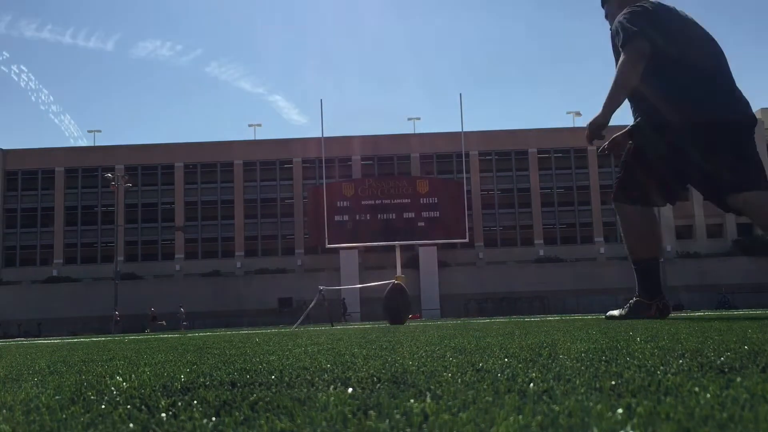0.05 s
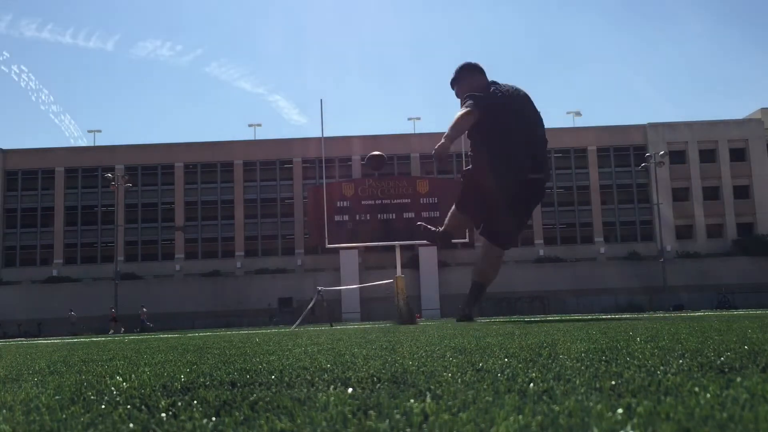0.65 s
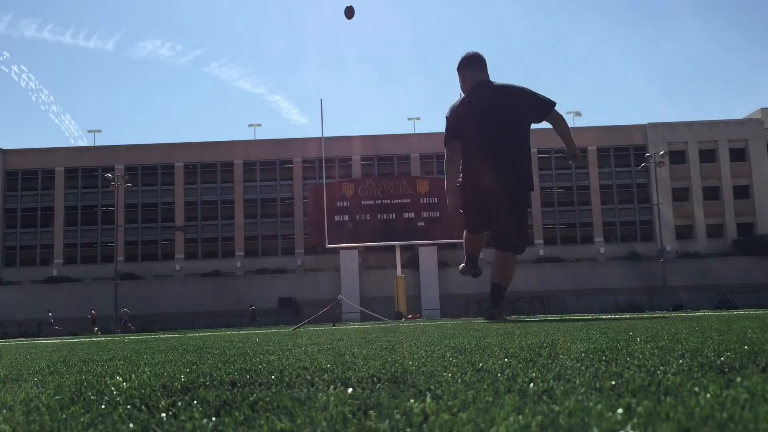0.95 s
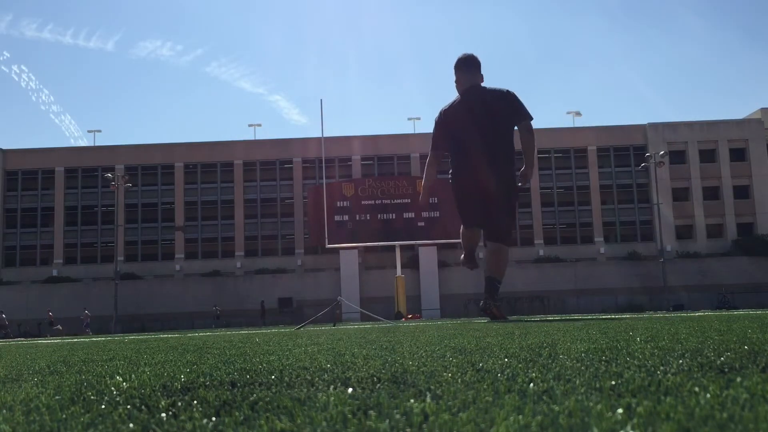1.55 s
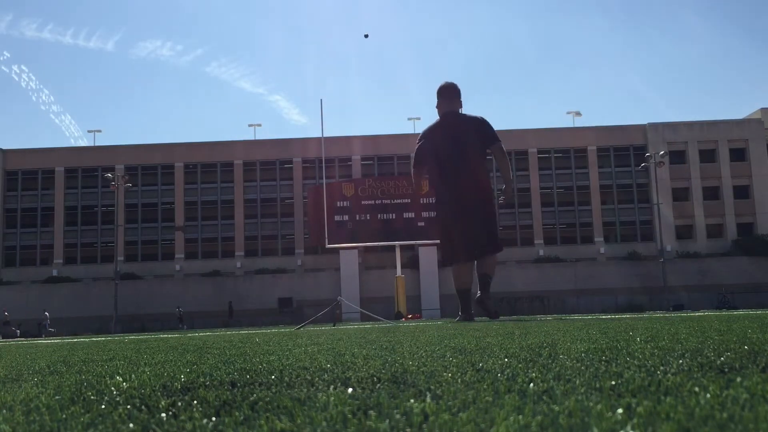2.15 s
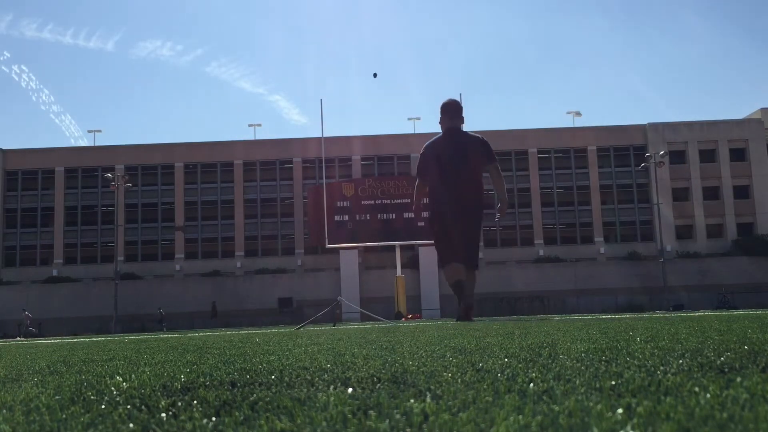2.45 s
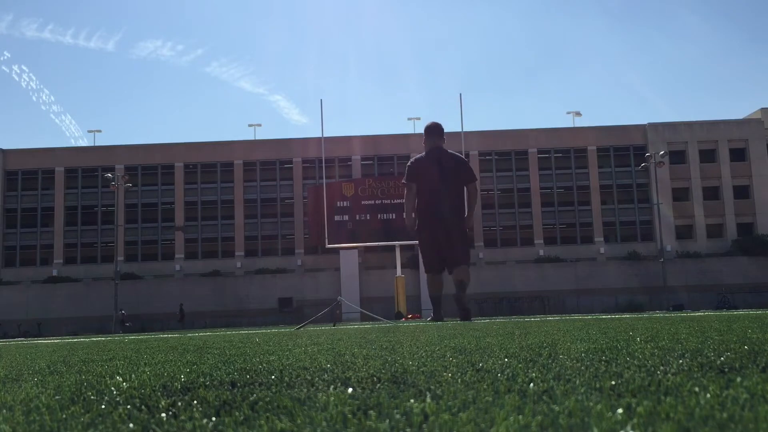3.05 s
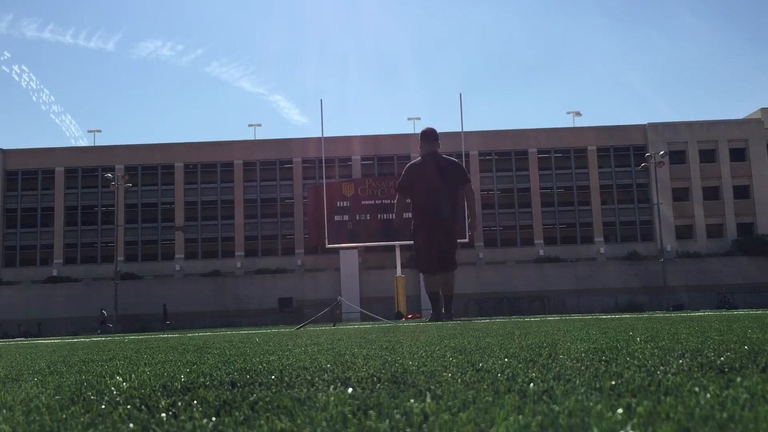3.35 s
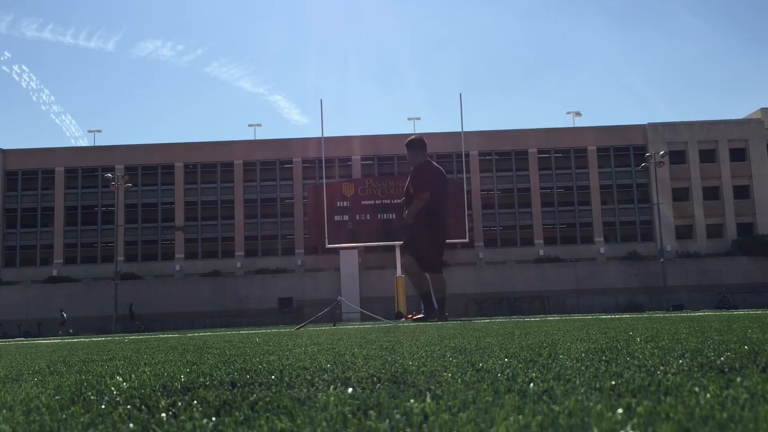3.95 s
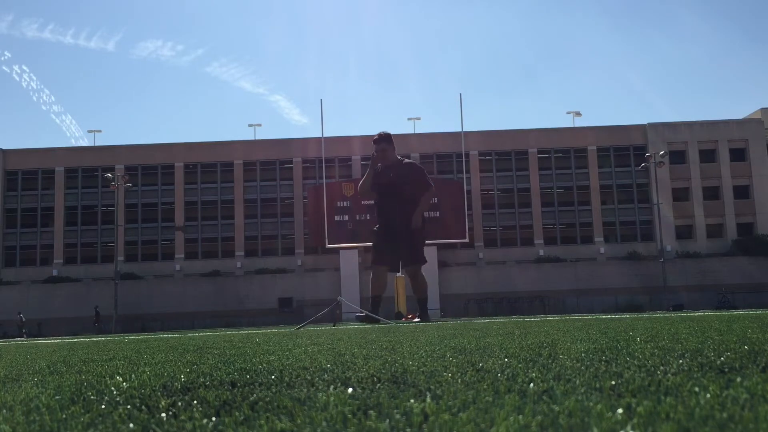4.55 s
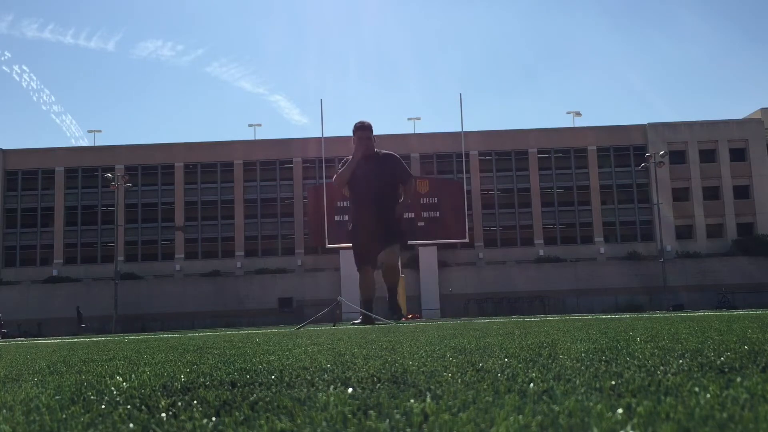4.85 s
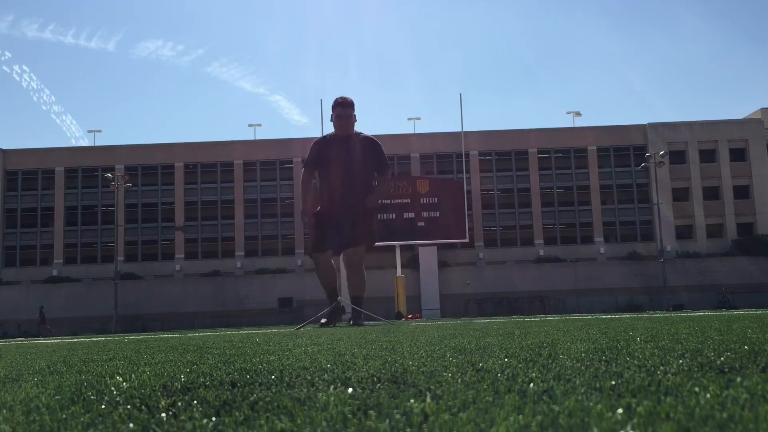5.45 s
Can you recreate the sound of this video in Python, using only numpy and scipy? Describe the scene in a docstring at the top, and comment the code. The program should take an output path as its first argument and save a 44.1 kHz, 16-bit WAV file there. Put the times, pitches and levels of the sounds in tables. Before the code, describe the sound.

A football is kicked with one loud, deep thud on an outdoor pitch, with soft footsteps over a steady low traffic rumble.

```python
"""On an artificial pitch in a city, a football is kicked off a tee near a microphone on the ground.
Traffic rumbles throughout. After a faint tick and two run-up steps the boot brushes the turf and strikes:
the ball thuds, its shell and enclosed air resonate, rubber crumbs spray and walls reflect the blow.
A limiter briefly ducks everything. The kicker lands, and two more footfalls come three seconds later."""
import sys
import numpy as np
from scipy import signal
from scipy.fft import rfft, irfft, next_fast_len
from scipy.io import wavfile
from scipy.ndimage import uniform_filter1d, minimum_filter1d, map_coordinates

SR = 44100
rng = np.random.default_rng(int(sys.argv[2]) if len(sys.argv) > 2 else 0)


def unload_audio(sound):
    """Save the sound as a 16-bit wav file, at the path given as the first command line argument."""
    columns = np.transpose(np.atleast_2d(sound))
    # keep every value between -1 and 1, then stretch to whole-number steps
    steps = np.round(np.clip(columns, -1, 1) * 32767)
    wavfile.write(sys.argv[1], SR, steps.astype(np.int16))


N = 246424
KICK_S = 0.6926  # the boot meets the ball

# Noise spectra. Each row: frequency in Hz, relative spectral density in dB.
ENGINE_SPECTRUM = [(20, -38.5), (30, -28.5), (40, -13), (48, -0.5), (62, -4.5), (100, 1.5), (140, -3),
                   (195, -5), (230, -14.5), (360, -23.5), (600, -37), (800, -46), (1200, -72)]
TYRE_SPECTRUM = [(250, -22.5), (500, -6.5), (780, -9), (970, -8), (1150, -11), (1800, -15.5), (2600, -22.5),
                 (5800, -29), (7600, -34.5), (15000, -51)]
TICK_SPECTRUM = [(5000, -25), (7200, 1), (9500, -1), (11000, -16), (15000, -13.5)]
SOLE_SPECTRUM = [(200, -2), (550, 13), (1000, 4), (1800, -7), (3000, -24), (8000, -25), (15000, -39)]
BLADE_SPECTRUM = [(200, -6), (600, 16), (1500, -9), (2800, -4), (6000, -14), (9000, -17), (15000, -18.5)]
CRACK_SPECTRUM = [(500, -3.5), (900, 6), (1400, -0.5), (1900, -13.5), (2600, -19), (3800, -12.5),
                  (6500, -27), (9000, -34.5), (12500, -29.5), (15500, -34)]
CRUMB_SPECTRUM = [(800, -26), (2500, 4), (3600, 4), (6500, 2.5), (10000, -4), (15000, -5)]
HISS_SPECTRUM = [(1000, 0.5), (5600, 2.5), (7600, -1.5), (9200, 2), (10500, -7), (12000, 0.5), (15600, -9)]
# Feet on turf. Each row: start in seconds, knock frequency in Hz, knock level in dB, scuff level in dB.
FOOTFALLS = [(.468, 605, -41, -55), (0.61, 520, -43.5, -49), (0.927, 535, -54, -59), (4.093, 288, -34, -62),
             (4.2036, 210, -23.5, -66)]
# Modes of the taut leather shell and of the air inside it.
# Each row: frequency in Hz, level in dB, time to decay by 60 dB in seconds.
SHELL_MODES = [(767, -23.5, 0.023), (845, -13.5, 0.013), (1210, -22.5, 0.018), (1840, -25, 0.029),
               (2220, -33.5, 0.015), (3900, -36, 0.014), (5500, -39, 0.006), (6270, -32, 0.015)]
CAVITY_MODES = [(887, -36.5, 0.21), (1490, -47, 0.19), (1700, -46, 0.15), (2060, -49, 0.18),
                (3230, -56, 0.16)]
# Reflections from the walls around the pitch.
# Each row: delay in seconds, level in dB before WALL_RESPONSE, time to decay by 60 dB in seconds.
REFLECTIONS = [(.038, -37.5, 0.1), (0.094, -39, 0.42)]
# Frequency response of the walls. Each row: frequency in Hz, gain in dB.
WALL_RESPONSE = [(100, -18), (400, -11), (900, 13.5), (2000, 15.5), (5000, 10), (14000, 6)]


def amp(db):
    """Decibels as an amplitude ratio."""
    return 10 ** (np.asarray(db) / 20)


def since(s):
    """Seconds elapsed after time s, zero before it."""
    return np.maximum(np.arange(N) / SR - s, 0)


def swell(t, peak_s, order=2):
    """A smooth rise to 1 at peak_s, then an exponential decay."""
    u = t / max(peak_s, 1e-4)
    return (u * np.exp(1 - u)) ** order


def hump(s, half_s):
    """A Gaussian of height 1 around time s."""
    return np.exp(-((since(0) - s) / half_s) ** 2)


def wobble(rate):
    """A smooth random curve, rate knots a second."""
    knots = rng.standard_normal(int(N * rate / SR) + 4)
    return map_coordinates(knots, [np.arange(N) * rate / SR])


def filtered(x, response):
    """The spectrum of x multiplied by a frequency response."""
    size = next_fast_len(N + SR // 2)
    return irfft(rfft(x, size) * response(np.fft.rfftfreq(size, 1 / SR)), size)[:N]


def coloured(x, spectrum):
    """x shaped by (Hz, dB) points joined on a logarithmic frequency axis."""
    points_hz, db = np.transpose(spectrum)
    return filtered(x, lambda hz: amp(np.interp(np.log(hz + 1), np.log(points_hz + 1), db)))


def noise(spectrum, grain_db=0):
    """Coloured noise of rms 1; grain_db roughens it by fast amplitude modulation."""
    grains = amp(grain_db * wobble(1500))
    x = coloured(rng.standard_normal(N) * grains, spectrum)
    return x / np.sqrt(np.mean(x ** 2) + 1e-20)


def traffic(engine_db=-33, tyre_db=-66, lift_db=2):
    """Incoherent sources sum to noise: distant engines rumble, and tyres swell as nearer cars pass."""
    surge_db = lift_db * hump(1.14, half_s=0.42)
    passing_db = lift_db * hump(1.58, half_s=2.9)
    engines = amp(engine_db + surge_db + 0.5 * wobble(9.8))
    tyres = amp(tyre_db + passing_db + 0.7 * wobble(7))
    return engines * noise(ENGINE_SPECTRUM) + tyres * noise(TYRE_SPECTRUM)


def tick(start_s=0.23, db=-69):
    """A short transient of high-frequency noise is heard as one faint tick."""
    return amp(db) * swell(since(start_s), peak_s=0.0035, order=1) * noise(TICK_SPECTRUM)


def footsteps():
    """Each impact excites a heavily damped knock, and friction under the sole adds a dull scuff."""
    scuff, out = noise(SOLE_SPECTRUM), np.zeros(N)
    for start_s, hz, knock_db, scuff_db in FOOTFALLS:
        t = since(start_s)
        knock = amp(knock_db) * np.sin(2 * np.pi * hz * t)
        out += swell(t, peak_s=0.0037) * (knock + amp(scuff_db) * scuff)
    return out


def turf(lead_s=0.0186, bump_hz=200, bump_db=-27, brush_db=-41):
    """Impact and friction: the boot bumps the turf and brushes the blades on its way to the ball."""
    t = since(KICK_S - lead_s)
    bump = amp(bump_db) * np.sin(2 * np.pi * bump_hz * t)
    brush = amp(brush_db) * noise(BLADE_SPECTRUM)
    return swell(t, peak_s=0.012, order=1) * (bump + brush)


def thud(start_hz=205, end_hz=42, sag_s=0.012, db=6):
    """Volume displacement: the ball flattens and rebounds, its pitch sinking as the contact relaxes."""
    t = since(KICK_S)
    cycles = end_hz * t + (start_hz - end_hz) * sag_s * (1 - np.exp(-t / sag_s))
    return amp(db) * swell(t, peak_s=0.0066) * np.sin(2 * np.pi * cycles)


def slap(skin_hz=430, skin_db=2, lag_s=0.00029, crack_db=-16, spread_s=0.0011, contact_s=0.003):
    """Contact radiation: dented leather flaps, cracks as the contact spreads, then peels off the boot."""
    t = since(KICK_S + lag_s)
    skin = -amp(skin_db) * swell(t, peak_s=0.0016) * np.sin(2 * np.pi * skin_hz * t)  # inward first
    t = since(KICK_S)
    contact = np.sqrt(1 - np.exp(-t / spread_s)) * np.exp(-(t / contact_s) ** 6)
    peeling = amp(-21) * swell(t, peak_s=0.0044, order=1)
    return skin + amp(crack_db) * (contact + peeling) * noise(CRACK_SPECTRUM)


def ring(modes):
    """Free vibration: the blow excites normal modes, each decaying exponentially at its own rate."""
    t = since(KICK_S)
    return sum(amp(db - 60 * t / t60) * np.sin(2 * np.pi * hz * t) for hz, db, t60 in modes)


def flex(hz=68, db=-20):
    """Elastic oscillation: the ball leaves the boot still flexing, a short, deep tail to the thud."""
    t = since(KICK_S)
    return amp(db) * swell(t, peak_s=0.02, order=4) * np.sin(2 * np.pi * hz * t)


def crumbs(flight_s=0.069, flight_spread=0.36):
    """Independent impacts add in power: rubber crumbs fly up, land and trickle between the blades."""
    t = since(KICK_S)
    thrown = amp(-55.5) * swell(t, peak_s=0.016)
    landing = amp(-56.5) * np.exp(-(np.log(t / flight_s + 1e-9) / flight_spread) ** 2)
    settling = amp(-69.5) * swell(t, peak_s=0.11, order=6)
    return np.sqrt(thrown ** 2 + landing ** 2 + settling ** 2) * noise(CRUMB_SPECTRUM, grain_db=0.5)


def echoes(x):
    """Diffuse reflection: the walls scatter the blow back, delayed and thinned in the bass."""
    impulse_response = np.zeros(N)
    for delay_s, db, t60 in REFLECTIONS:
        t = since(delay_s)
        tail = (t > 0) * amp(-60 * t / t60) * rng.standard_normal(N)
        impulse_response += amp(db) * tail / np.linalg.norm(tail)
    return coloured(signal.fftconvolve(x, impulse_response)[:N], WALL_RESPONSE)


def limiter(x, ceiling=0.97, hold_s=0.192, ease_s=0.0033):
    """Automatic gain reduction: the gain drops to keep a peak under the ceiling, holds, then recovers."""
    hold, ease = int(hold_s * SR), int(ease_s * SR)
    needed = np.minimum(1, ceiling / (np.abs(x) + 1e-9))
    held = minimum_filter1d(needed, hold, origin=(hold - 1) // 2)
    return x * uniform_filter1d(minimum_filter1d(held, ease), ease)


def scene():
    """Superposition: the ball, its echoes and the sounds around it add in one channel."""
    ball = thud() + flex() + slap() + ring(SHELL_MODES) + ring(CAVITY_MODES)
    return (ball + echoes(ball) + turf() + crumbs() + footsteps() + tick() + traffic())[None]


def record(dry, hiss_db=-78.5, top_hz=15730):
    """Microphone self-noise adds faint hiss; the sum is limited in level, then in bandwidth."""
    heard = dry[0] + amp(hiss_db) * noise(HISS_SPECTRUM)
    return filtered(limiter(heard), lambda hz: hz < top_hz)[None]


dry = scene()
out = record(dry)
unload_audio(out)
```